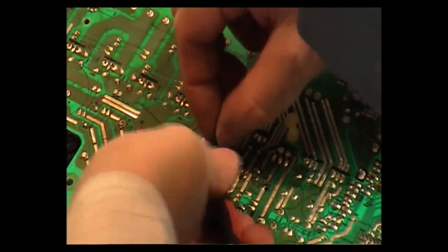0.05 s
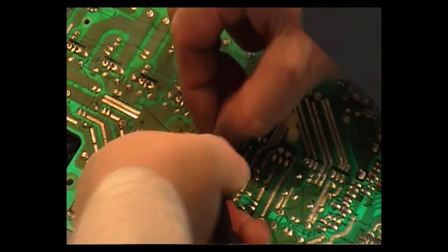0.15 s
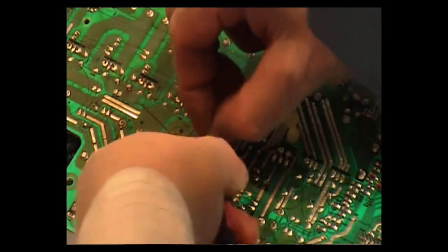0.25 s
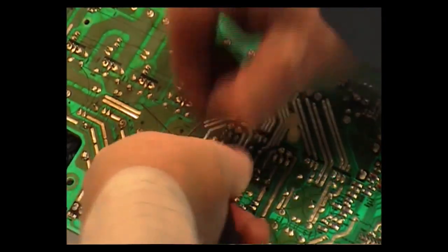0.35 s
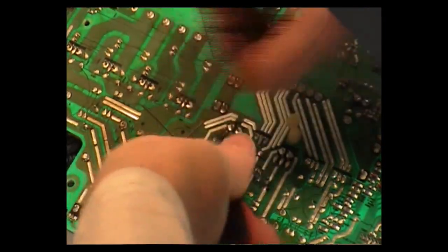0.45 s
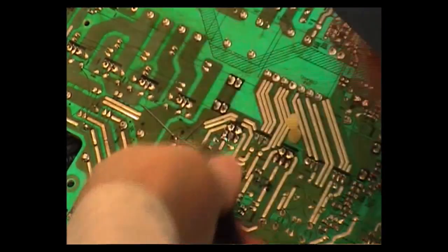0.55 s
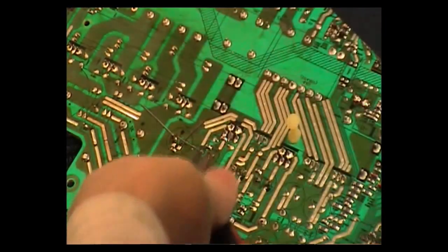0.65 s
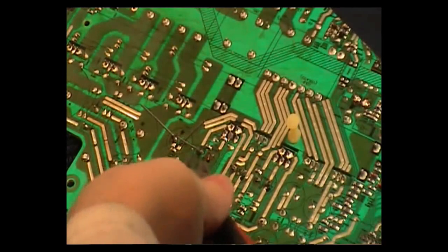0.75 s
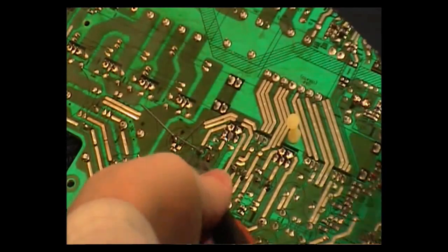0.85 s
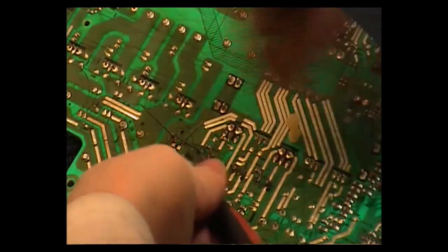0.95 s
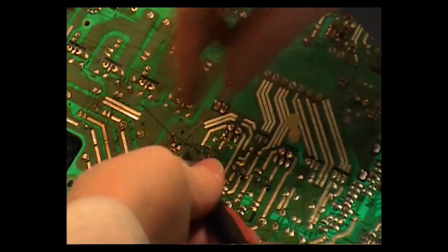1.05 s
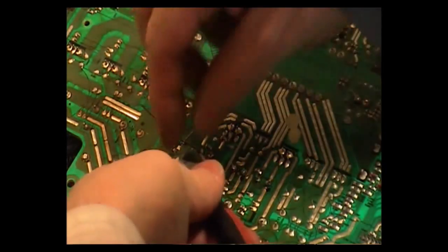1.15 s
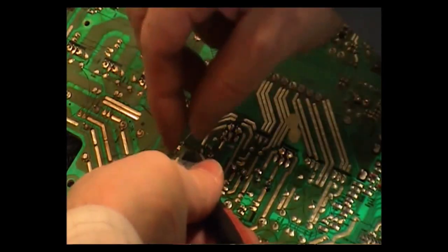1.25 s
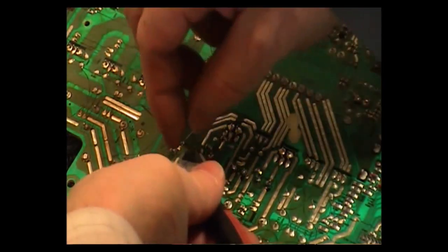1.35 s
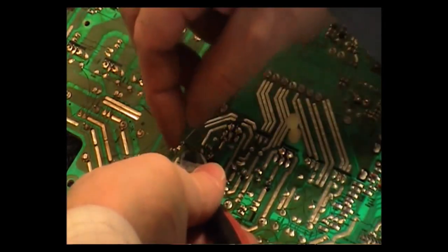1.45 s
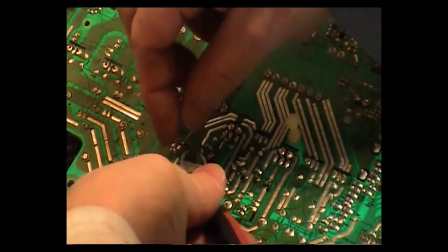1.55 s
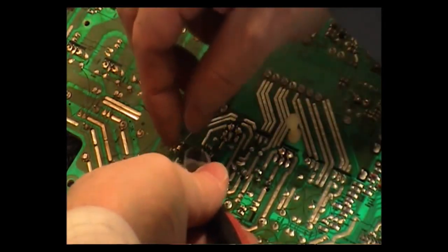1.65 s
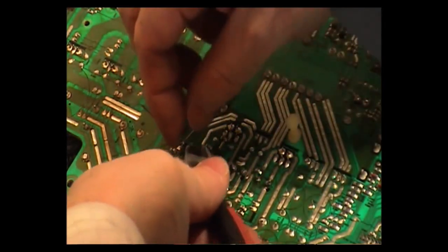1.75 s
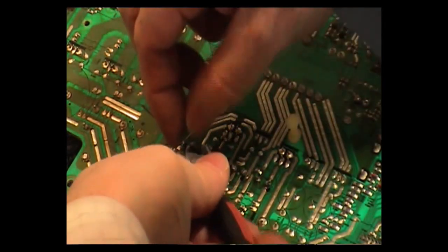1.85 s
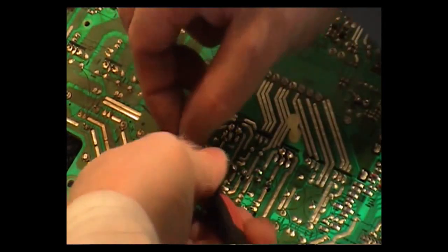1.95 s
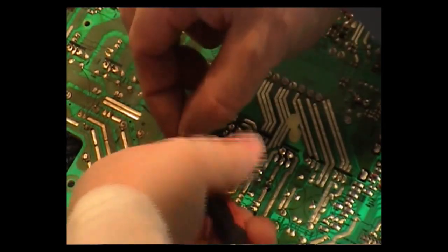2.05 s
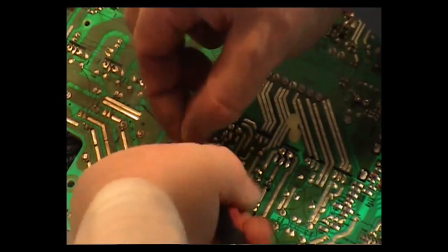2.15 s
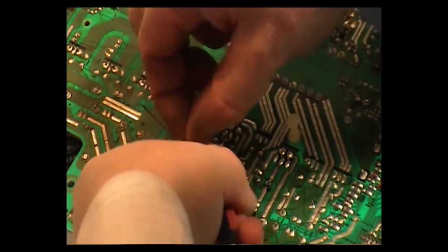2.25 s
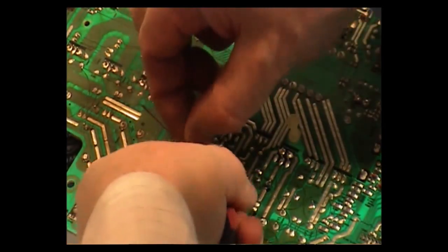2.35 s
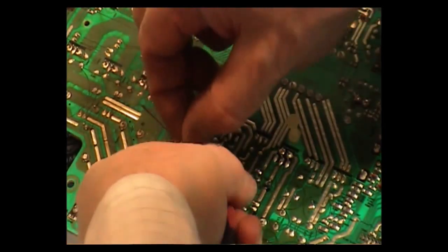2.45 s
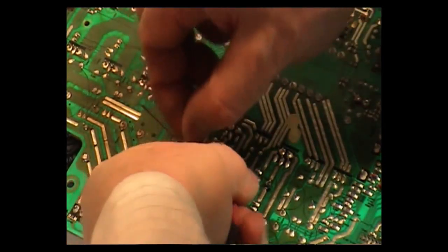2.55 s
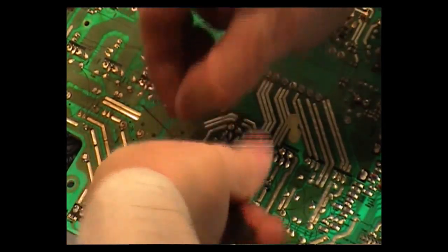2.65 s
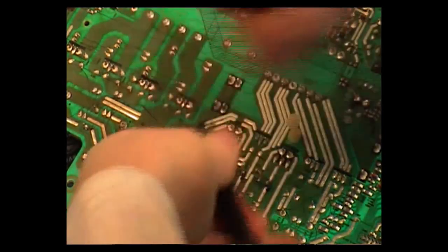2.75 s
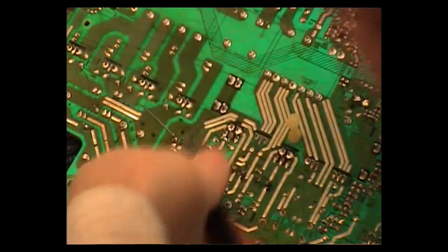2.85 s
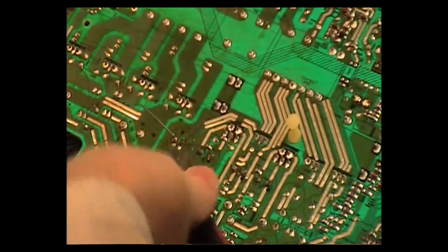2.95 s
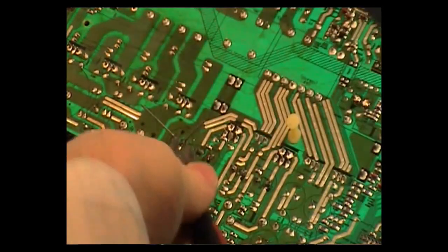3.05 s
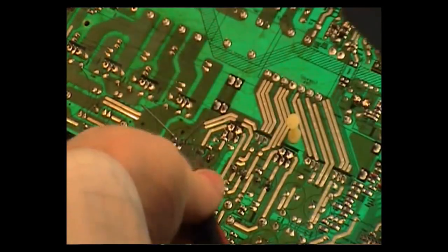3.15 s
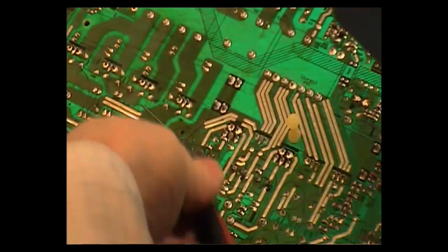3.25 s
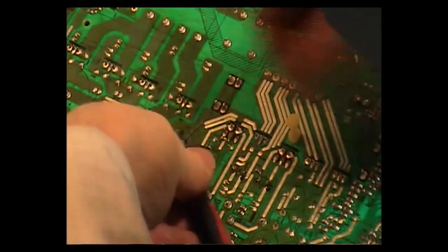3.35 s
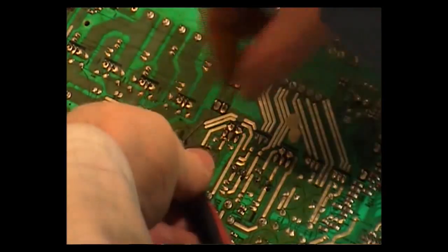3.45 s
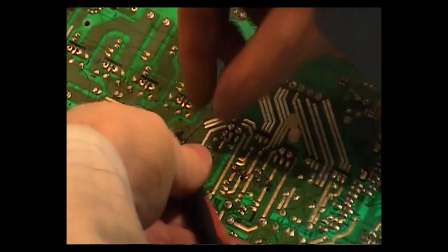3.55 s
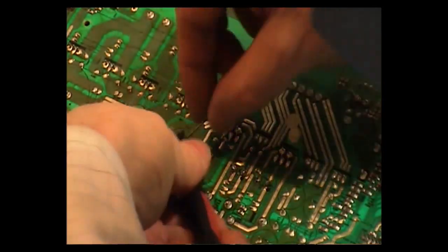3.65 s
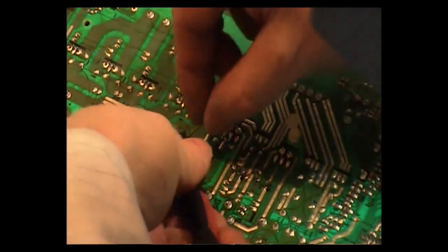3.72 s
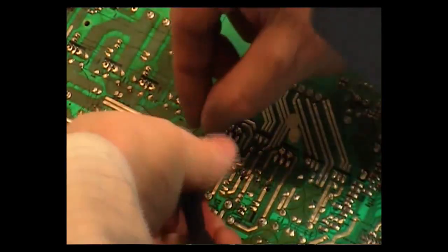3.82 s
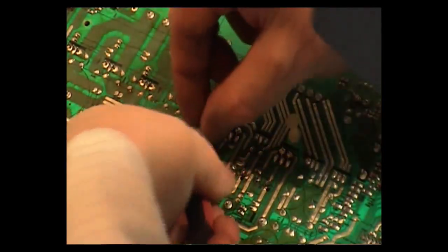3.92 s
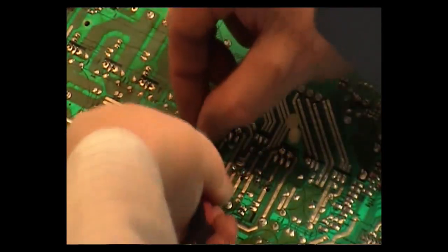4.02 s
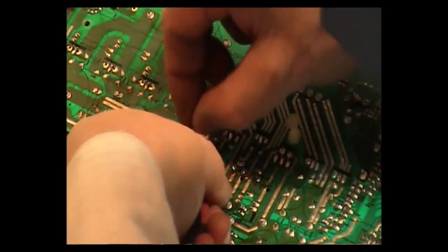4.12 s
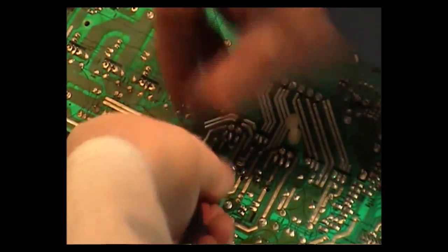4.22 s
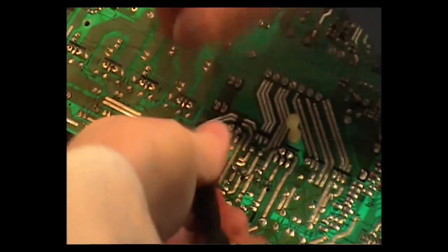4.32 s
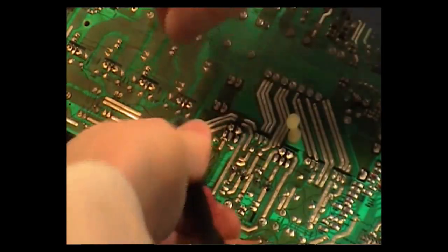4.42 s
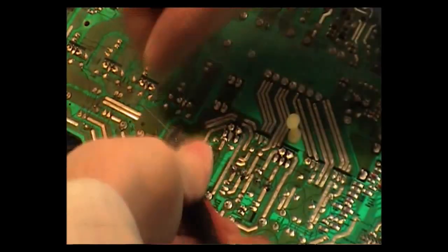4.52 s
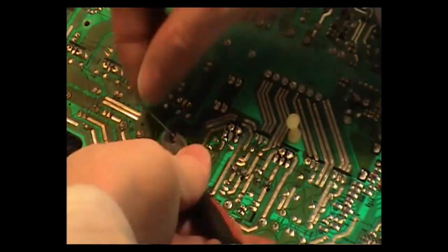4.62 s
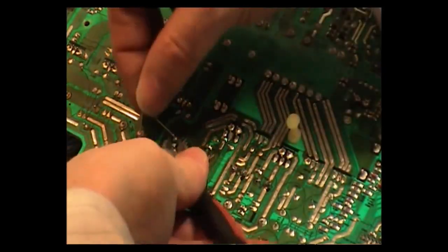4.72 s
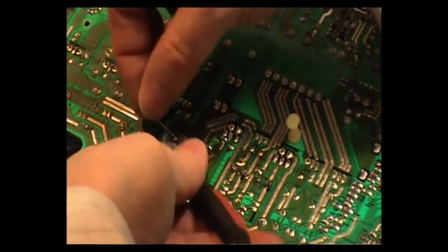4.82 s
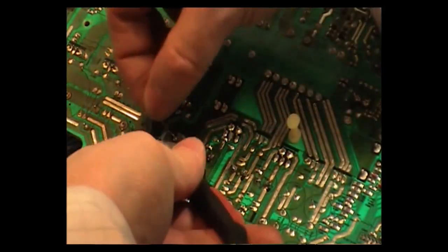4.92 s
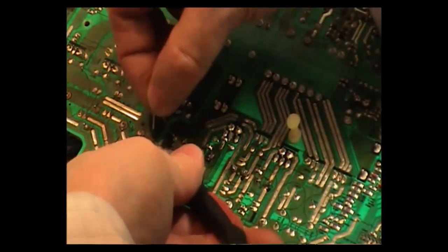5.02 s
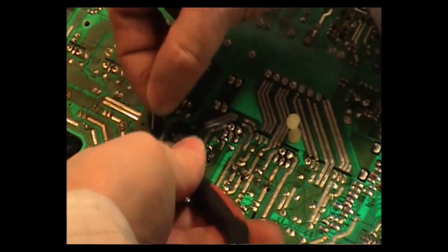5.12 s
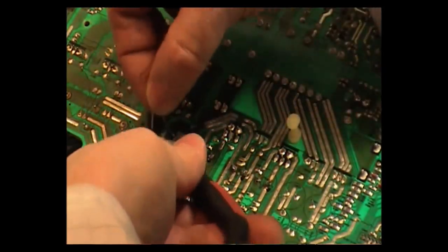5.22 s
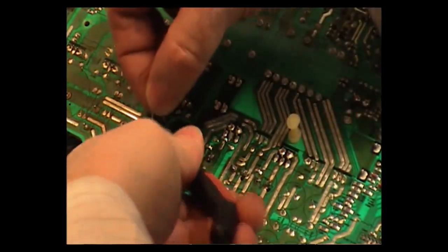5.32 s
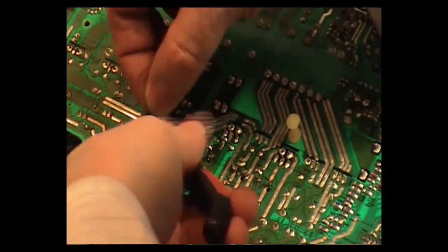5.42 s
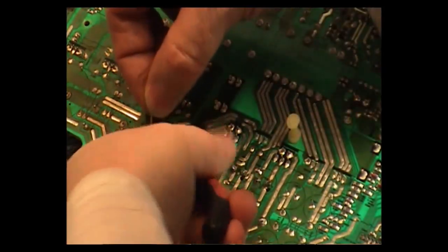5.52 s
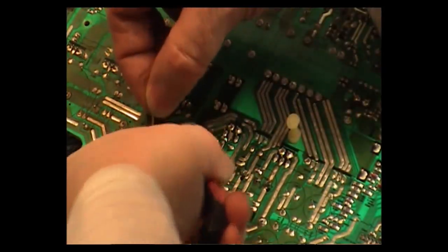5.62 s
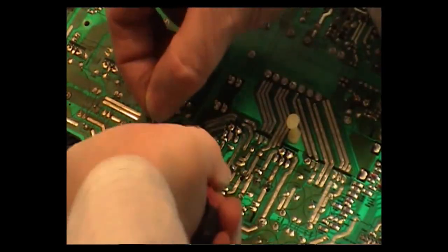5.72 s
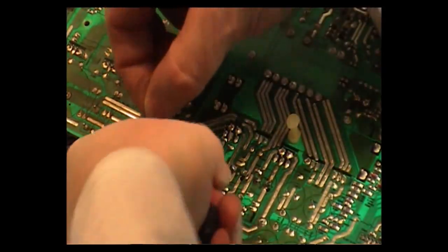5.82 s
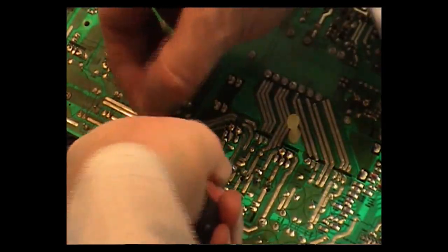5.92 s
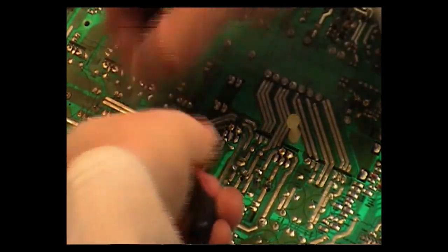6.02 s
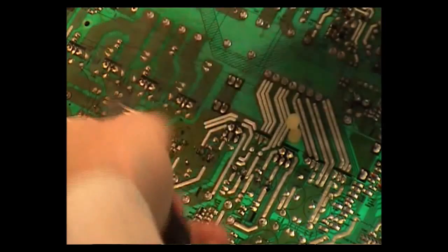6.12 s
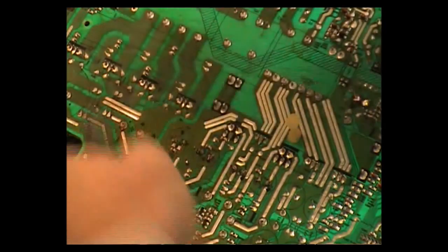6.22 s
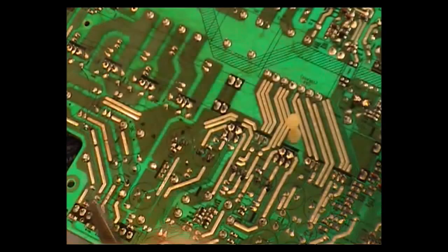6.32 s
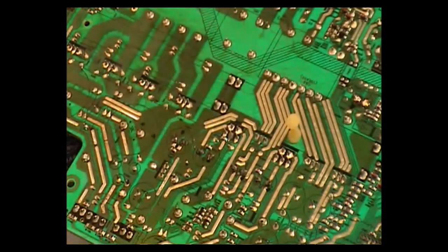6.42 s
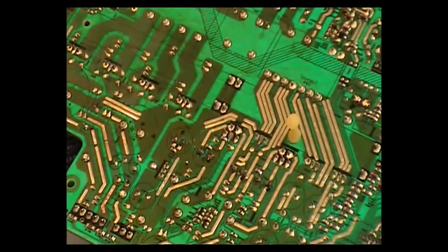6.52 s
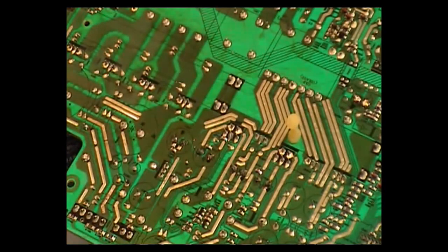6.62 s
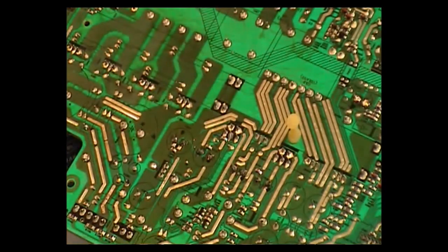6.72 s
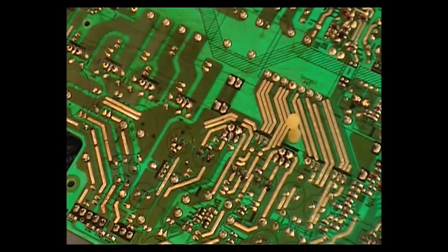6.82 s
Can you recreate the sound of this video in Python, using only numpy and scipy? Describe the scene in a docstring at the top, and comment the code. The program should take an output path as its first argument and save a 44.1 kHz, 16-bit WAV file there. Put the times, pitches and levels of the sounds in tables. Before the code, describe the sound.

About ten crisp snips, roughly half a second to just over a second apart, each with a short bright room tail. Quiet ticks, knocks and gritty rubs of the tool on solder joints fill the gaps. A faint motor whine enters midway and sags in pitch. A short squeak follows the cutting. Close-miked in stereo, over soft room noise and rumble.

```python
"""On a workbench in a small hard room, side cutters snip component leads off a circuit board.
Each cut or sharp click is an impulse of force that rings board, handles, steel jaws and wire, then repeats.
Between cuts the jaws tap, and filtered noise makes the strokes that rub and scrape over the solder joints.
Near the end a stick-slip squeak sounds; room noise, a low rumble and a far motor's sagging whine lie behind.
Two close microphone ports hear it, each with its own cavity resonance in the treble."""
import sys
import numpy as np
from scipy import signal
from scipy.fft import rfft, irfft, next_fast_len
from scipy.io import wavfile
from scipy.ndimage import uniform_filter1d, map_coordinates

SR = 44100
rng = np.random.default_rng(int(sys.argv[2]) if len(sys.argv) > 2 else 0)


def file_out(sig):
    """Save sig as 16-bit WAV at sys.argv[1]."""
    # one column per channel
    cols = np.atleast_2d(sig).T
    # limit, then scale
    lim = np.clip(cols, -1, 1)
    pcm = np.round(lim * 32767).astype(np.int16)
    wavfile.write(sys.argv[1], SR, pcm)


N = 302945  # length of the scene (samples)
SECONDS = np.arange(N) / SR
SIZE = 24576  # length of one contact with its room tail (samples)
T = np.arange(SIZE) / SR
HZ = np.fft.rfftfreq(SIZE, 1 / SR)


def amp(db):
    """Level law: decibels to amplitude gain."""
    return 10 ** (np.asarray(db) / 20)


def unit(x):
    """Normalization: scale to rms 1."""
    return x / np.sqrt(np.mean(np.abs(x) ** 2) + 1e-20)


def along(points, hz):
    """Logarithmic pitch: interpolate (pitch_hz, value) points on a log frequency axis."""
    f, v = np.transpose(points)
    return np.interp(np.log(hz + 1), np.log(f + 1), v)


def curves(rows):
    """Linear interpolation: one value per sample for each column after the time."""
    s, *columns = np.transpose(rows)
    return [np.interp(SECONDS, s, column) for column in columns]


def during(rows):
    """Gating: open over the span of a curve, with softened edges."""
    is_open = (SECONDS > rows[0][0]) & (SECONDS < rows[-1][0])
    return uniform_filter1d(1.0 * is_open, size=400)


def wobble(rate):
    """Random modulation: a smooth curve through rate random knots a second."""
    knots = rng.standard_normal(int(N * rate / SR) + 4)
    return map_coordinates(knots, [np.arange(N) * rate / SR])


def filtered(x, response):
    """Linear filtering: multiply the spectrum of x by a response that is a function of frequency."""
    m = next_fast_len(N + SR // 2)
    return irfft(rfft(x, m) * response(np.fft.rfftfreq(m, 1 / SR)), m)[..., :N]


def resonances(modes, f):
    """Modal superposition: causal second-order resonances with alternating sign."""
    total = 0
    for k, (c, w, db) in enumerate(modes):
        total = total + (-1) ** k * amp(db) * 1j * f * w / (c * c - f * f + 1j * f * w)
    return total


def noise(response, side_db=-22, side_hz=3000, treble_width=.5):
    """Partial coherence: coloured stereo noise, near mono in the bass and wider toward the treble."""
    def mid_and_side(f):
        width = amp(side_db) + treble_width * f / (f + side_hz)
        return response(f) * [np.ones_like(f), width]
    mid, side = filtered(rng.standard_normal((2, N)), mid_and_side)
    return unit(np.array([mid + side, mid - side]))


def add(out, s, x):
    """Superposition: mix x into out from time s, fading its far end to silence."""
    i = max(0, round(s * SR))
    fade = np.clip((T[-1] - .09 - T) / .08, 0, 1)
    out[:, i:i + SIZE] += (x * fade)[:, :max(0, N - i)]


# Cuts of the tool, and sharp clicks such as clippings landing.
# Columns: start_s, board_level_db, hardness (no unit), handle_level_db,
# jaw_level_db, ping_pitch_hz, ping_width_hz, ping_level_db, rebound_delay_s,
# rebound_level_db (relative to the first impact), body_room_db (the board takes 1 dB less), steel_room_db
SNAPS = [(0.4972, -19.5, -0.091, -34.5, -40.5, 2330, 453, -38.5, 0.007, -2, -4, -3.5),
         (1.2729, -38, 0.77, -30, -30.5, 5770, 4000, -40, 0.007, 4, 7.5, -2.5),
         (2.0215, -59, 1.5, -45.5, -54, 6560, 4430, -38.5, 0.0035, -9, 2, 0),
         (2.365, -50, 0.66, -49.5, -37, 9550, 1872, -41.5, 0.0026, -0.5, -1, -8.5),
         (2.7265, -25, 1.26, -26.5, -14.5, 12120, 5000, -28, 0.0026, -6.5, 8.5, -2.5),
         (3.639, -46.5, 1.3, -37.5, -33, 11400, 3500, -32, 0.0031, 1, 1.5, -5),
         (4.0116, -57, 1.17, -42.5, -53.5, 5820, 2777, -30, 0.0022, -1.5, -1.5, 0.5),
         (4.342, -19, -0.32, -29, -26, 10170, 3470, -44.5, 0.0041, -2, -5.5, -7),
         (5.2514, -39.5, 0.86, -54, -53, 3200, 159, -49.5, 0.0033, 1, -2.5, -5),
         (6.0598, -20.5, -0.34, -23.5, -16, 11010, 5000, -30.5, 0.0007, -0.5, 3, -3.5)]


def snaps(parts):
    """Impulsive excitation: a cut or a landing clipping kicks the board, rings steel and wire, strikes again."""
    board, handle, jaws = parts
    out = np.zeros((2, N))
    for (s, board_db, hardness, handle_db, jaw_db, ping_hz, ping_width, ping_db,
         delay, rebound_db, body_wet_db, steel_wet_db) in SNAPS:
        lag = np.exp(-2j * np.pi * HZ * delay)
        rebound = amp(rebound_db) * unit(crack(life=0.0054, grit=3.0)) * lag
        force = unit(crack(life=.0007, grit=1.0)) + rebound
        tail = room()
        wire = resonances([(ping_hz, ping_width, 0)], HZ) ** 2
        kick = crack(life=.004, grit=.35)
        body = struck(kick, board * contact(hardness), board_db, tail, body_wet_db - 1.0)
        body += struck(force, handle, handle_db, tail, body_wet_db)
        steel = struck(force, jaws, jaw_db, tail, steel_wet_db)
        steel += struck(force, wire, ping_db, tail, steel_wet_db)
        add(out, s, irfft(body + steel))
    return out


def crack(life, grit):
    """Impact force: the spectrum of an impulse plus a gritty noise tail that decays over life seconds."""
    return 1 + grit * unit(rfft(rng.standard_normal(SIZE) * np.exp(-T / life)))


def contact(hardness):
    """Contact stiffness: hardness above 0 weakens the low modes against the high; below 0, the reverse."""
    return ((HZ + 300) / (HZ + 2500)) ** hardness


def struck(force, body, db, tail, wet_db, imprint=0.52):
    """Source-filter principle: force times body, direct and by way of the room; db = rms over 10 ms."""
    direct = unit(force * body)
    # the room gathers all directions, which evens out the crack's colour
    evened = (np.abs(force) + 1e-6) ** imprint
    both = direct + amp(wet_db) * unit(tail * body * evened)
    return amp(db) * np.sqrt(SR / 100) * both / np.sqrt(1 + amp(wet_db) ** 2)


# Modes of the board, the handles and the jaws. Columns: pitch_hz, width_hz, level_db (relative)
BOARD = [(251.3, 25.2, -11.5), (313.4, 14, -1.5), (413, 27, -6), (487.8, 17.5, 2.5), (593, 81, 0.5),
         (690, 18, 1.5), (745.7, 11, 3), (818.5, 41, 2), (892, 26, 3), (1007, 59, 3), (1073, 17, 5),
         (1166.3, 26.6, 6), (1326, 25, 0.5), (1435, 29.7, 1.5), (1506, 15, -2.5), (1565, 40, -4.5),
         (1706, 35, -1.5), (1747, 56, -4.5)]
HANDLE = [(1977, 52, 2), (2093, 46.5, 1.5), (2448, 270, 2.5), (2790, 190, 6), (3147, 470, 2.5),
          (3600, 290, 4), (3870, 190, 5.5), (4300, 170, 4), (5340, 270, -11.5)]
JAWS = [(5240, 1120, -15.5), (6460, 730, -7), (7580, 620, -1.5), (8210, 350, -1.5), (8740, 800, -4.5),
        (10080, 720, -5), (10920, 1140, -7.5), (13320, 5500, -15.5)]


def bodies():
    """Modal response: the spectra of board, handles and jaws."""
    return [resonances(modes, HZ) for modes in (BOARD, HANDLE, JAWS)]


HANDLE_FOLLOWS_JAW, HANDLE_DB = 0.61, -1  # handle level: share of the way from board to jaws, offset (dB)
# Light contacts of the jaws with leads and board.
# Columns: start_s, board_level_db, hardness (no unit), jaw_level_db
TAPS = [(0.082, -49.5, 2.5, -63), (0.122, -48, -1, -56.5), (0.648, -39.5, -4, -56.5), (0.656, -36, -4, -72),
        (0.682, -38, -2.3, -53), (0.735, -62, 2, -51), (1.045, -44, -2, -58), (1.144, -48.5, -1, -59),
        (1.215, -40, 0.3, -63), (1.407, -47.5, -1.5, -67), (1.607, -54, 5, -58), (1.734, -46, 5, -53.5),
        (1.806, -49, 6.5, -51.5), (1.895, -50, 5.5, -55), (1.919, -54.5, -2.5, -59), (1.955, -52, 5.5, -56),
        (2.233, -43, -3, -61.5), (2.427, -44.7, -3, -60), (2.461, -47, -2.5, -61.5),
        (2.555, -45.5, -1.9, -63), (2.887, -39.5, -0.2, -61.5), (2.955, -45, -1.5, -67.5),
        (2.968, -46.5, 2.1, -47.5), (3.551, -49, -0.6, -69.5), (3.721, -37.5, 0, -51),
        (3.7253, -39.5, 0, -47), (3.796, -41.5, -0.3, -47), (4.004, -50.5, 4, -46),
        (4.493, -45.5, 0, -51.5), (4.584, -54, 3.5, -40), (4.842, -42.5, -1.5, -58), (4.866, -50, 1.5, -59),
        (5.104, -51.5, -2, -62.5), (5.452, -49.5, -2, -70), (5.52, -47.5, -0.5, -64.5),
        (5.943, -43.5, -1, -59), (5.982, -41.5, -1.4, -64), (6.275, -43, -1.5, -70)]


def taps(parts, body_wet_db=-5, steel_wet_db=-2, soft_hz=12000):
    """Light impact: the jaws feel for the next lead, a knock on the board and a short grating of steel."""
    board, handle, jaws = parts
    softened_jaws = jaws / (1 + 1j * HZ / soft_hz) ** 2
    out = np.zeros((2, N))
    for s, board_db, hardness, jaw_db in TAPS + ticks():
        knock, grate = crack(life=.005, grit=.7), crack(life=.005, grit=1.6)
        tail = room()
        handle_db = board_db + HANDLE_FOLLOWS_JAW * (jaw_db - board_db) + HANDLE_DB
        body = struck(knock, board * contact(hardness), board_db, tail, body_wet_db)
        body += struck(grate, handle, handle_db, tail, steel_wet_db)
        steel = struck(grate, softened_jaws, jaw_db, tail, steel_wet_db)
        add(out, s, irfft(body + steel))
    return out


TICK_COUNT, TICKS_END_S = 12, 6.3
TICK_BOARD_DB, TICK_JAW_DB, TICK_SPREAD_DB = -56.5, -70.5, 3.5  # mean levels and their standard deviation


def ticks():
    """Random process: faint stray touches while the tool hunts, one per equal slot, as rows like the taps."""
    when = (np.arange(TICK_COUNT) + rng.random(TICK_COUNT)) * TICKS_END_S / TICK_COUNT
    rows = []
    for s, (a, hardness, b) in zip(when, rng.standard_normal((TICK_COUNT, 3))):
        rows.append((s, TICK_BOARD_DB + TICK_SPREAD_DB * a, hardness, TICK_JAW_DB + TICK_SPREAD_DB * b))
    return rows


def grains():
    """Asperity contact: a gain that flickers at random as tiny grains catch."""
    return unit(amp(3.5 * wobble(420) + 2.5 * wobble(60)))


def chatter(modes, rolloff_hz=np.inf):
    """Friction-driven resonance: grainy noise rings a body, with the treble rolled off above rolloff_hz."""
    rough = grains() * rng.standard_normal(N)
    return unit(filtered(rough, lambda f: resonances(modes, f) / (1 + (f / rolloff_hz) ** 2)))


# Strokes of hand and tool over the board. Columns: peak_s (firmest pressure), rise_s, fall_s,
# thud_level_db, rub_level_db, scratch_level_db (rub and scratch play 4 dB lower)
DRAGS = [(0.695, 0.054, 0.067, -46, -36.5, -45.5), (0.735, 0.028, 0.19, -53.5, -62, -57),
         (1.77, 0.027, 0.26, -69, -76, -54), (4.125, 0.012, 0.099, -75, -73, -48.5),
         (4.554, 0.1, 0.089, -52, -45, -45), (4.65, 0.043, 0.11, -57, -70, -75),
         (4.781, 0.072, 0.053, -71, -72, -46), (4.86, 0.05, 0.23, -62, -48, -60.5),
         (6.2, 0.36, 0.58, -65, -52.5, -57.5), (6.658, 0.027, 0.073, -76, -50, -50),
         (6.76, 0.086, 0.33, -64, -49.5, -54.5)]
# Colours of the thud and of the scratch noise. Columns: pitch_hz, level_db (relative)
THUD = [(30, -7), (70, -24), (130, 0.5), (250, -5.5), (500, -10.5), (2000, -94)]
SCRATCH = [(800, -20), (2000, -4.5), (3900, -5), (5200, -10), (7800, -13), (10500, -12), (15000, -34)]


def drags(rub_db=-4, scratch_db=-4):
    """Sliding friction: the hand shifts the board while the tool catches on the solder in tiny grains."""
    thud = noise(lambda f: amp(along(THUD, f)))
    rub = chatter(BOARD, rolloff_hz=700)
    steel = chatter(HANDLE) + chatter(JAWS)  # each chatters on its own
    hiss = grains() * noise(lambda f: amp(along(SCRATCH, f)))
    scratch = unit(steel + 2.3 * hiss)
    out = np.zeros((2, N))
    for s, rise, fall, thud_db, row_rub_db, row_scratch_db in DRAGS:
        layers = amp(thud_db) * thud
        layers = layers + amp(row_rub_db + rub_db) * rub
        layers = layers + amp(row_scratch_db + scratch_db) * scratch
        out += stroke(s, rise, fall) * layers
    return out


STROKE_RANGE_DB = 20.5  # change of level over one rise or one fall
STROKE_ROUNDING = 1.2  # above 1, the pressure lingers near its peak


def stroke(peak_s, rise_s, fall_s):
    """Pressure envelope: the gain builds to a peak and eases off."""
    t = SECONDS - peak_s
    distance = np.clip(np.maximum(-t / rise_s, t / fall_s), 0, 10)
    return amp(-STROKE_RANGE_DB * distance ** STROKE_ROUNDING)


SQUEAK_JITTER, SQUEAK_JITTER_PER_S = .012, .5  # relative wander of the slip rate, and its growth
SQUEAK_ATTACK_S, SQUEAK_HOLD_S = .016, .035  # both counted from the start
SQUEAK_DB, SQUEAK_FADE_DB_PER_S = -43.5, 185  # direct level before the fade, and the fade
# Glide of the squeak. Columns: time_s, slip_rate_hz
SQUEAK = [(6.564, 605), (6.588, 628), (6.602, 680), (6.613, 870), (6.63, 820), (6.66, 570), (6.70, 540)]
# Resonances of the squeaking body. Columns: pitch_hz, width_hz, level_db (relative)
SQUEAK_BODY = [(622, 28, -6.5), (2000, 260, -8.5), (2880, 480, -13), (3900, 550, -12.5), (6160, 550, -19),
               (8000, 4700, -24.5)]


def squeak():
    """Stick-slip friction: harmonics of a gliding slip rate swell, hold, and grow less steady as they fade."""
    rate, = curves(SQUEAK)
    age = np.clip(SECONDS - SQUEAK[0][0], 0, 1)
    attack = np.minimum(age / SQUEAK_ATTACK_S, 1) ** 2
    level = attack * amp(SQUEAK_DB - SQUEAK_FADE_DB_PER_S * np.maximum(age - SQUEAK_HOLD_S, 0))
    jitter = (SQUEAK_JITTER + SQUEAK_JITTER_PER_S * age) * wobble(450)
    phase = np.cumsum(rate * (1 + jitter)) / SR
    slips = sum(np.cos(2 * np.pi * k * phase) * amp(5 * wobble(70)) for k in range(1, 14))
    tone = filtered(slips, lambda f: resonances(SQUEAK_BODY, f))
    loudness = np.sqrt(np.abs(uniform_filter1d(tone ** 2, size=400)) + 1e-9)
    direct = tone / loudness * level * during(SQUEAK)
    return signal.fftconvolve(direct[None], irfft(1 + amp(-4) * room()), axes=1)[:, :N]


# Reverberation of the room. Columns: pitch_hz, decay_60db_s
ROOM = [(200, 0.29), (800, 0.31), (2000, 0.34), (4200, 0.41), (8000, 0.36), (15000, 0.22)]


def room(build=0.0029, wall_s=0.035, wall_width=0.0047, wall_db=3):
    """Reverberation: a dense decaying tail builds up and swells briefly as the far walls answer."""
    hz, t, z = signal.stft(rng.standard_normal((2, SIZE)), SR, nperseg=256)
    decay = amp(-60 * t / along(ROOM, hz)[:, None])
    tail = signal.istft(z * decay, SR, nperseg=256)[1][:, :SIZE]
    walls = amp(wall_db * np.exp(-((T - wall_s) / wall_width) ** 2))
    swell = (1 - np.exp(-T / build)) * walls
    return unit(diffuse(rfft(tail * swell), HZ, PORT_GAP))


PORT_GAP = 0.034  # between the microphone ports (m)
ROOM_ALIKE = 0.32  # share of the room's answer that both ports hear alike at any pitch


def diffuse(pair, f, gap):
    """Diffuse-field coherence: two ports hear the bass alike and the treble less so (sound at 343 m/s)."""
    alike = ROOM_ALIKE + (1 - ROOM_ALIKE) * np.sinc(2 * f * gap / 343)
    turn = np.arccos(.99 * np.clip(alike, -1, 1)) / 2
    mid, side = pair[0] * np.cos(turn), pair[1] * np.sin(turn)
    return np.array([mid + side, mid - side])


WHINE_ON_S, WHINE_RISE_S, WHINE_DB = 2.91, .2, -60  # WHINE_DB: middle of the wavering peak level
WHINE_HZ, SAG_FROM_S, SAG_HZ_PER_S = 281, 4.6, 24


def motor():
    """Frequency modulation: a far motor's whine comes in, holds its pitch, then sags as it slows."""
    whine_hz = WHINE_HZ - SAG_HZ_PER_S * np.maximum(SECONDS - SAG_FROM_S, 0)
    phase = np.cumsum(whine_hz * (1 + 0.0119 * wobble(25))) / SR
    onset = np.clip((SECONDS - WHINE_ON_S) / WHINE_RISE_S, 0, 1)
    waver_db = 2.5 * wobble(14)
    return onset * amp(WHINE_DB + waver_db) * np.sin(2 * np.pi * phase)


# Swell of the low rumble. Columns: time_s, level_db (plays 3 dB higher)
RUMBLE = [(0.0, -69), (0.57, -66), (2.05, -68), (2.28, -72.5), (3.54, -61.5), (3.79, -69.5), (4.59, -56.5),
          (6.56, -73.5), (6.87, -57)]


def low_rumble(gain_db=3, pitch_hz=56, width_hz=13):
    """Narrow-band noise: a doubled resonance shapes a low rumble of changing level."""
    level_db = curves(RUMBLE)[0] + gain_db
    return amp(level_db) * noise(lambda f: resonances([(pitch_hz, width_hz, 0)], f) ** 2)


AIR_DB, AIR_RISE_DB_PER_S = -60, 0.4468  # level at the start, and its slow growth
AIR_WIDTH = 1.0  # the share of side to mid approaches this in the treble
# Colour of the room noise. Columns: pitch_hz, level_db (relative)
AIR = [(15, -32), (25, -17), (74, -6.5), (117, -9.5), (175, -11), (285, -6), (416, -9), (775, -11.5),
       (911, -16.5), (1330, -15.5), (2690, -27), (3720, -27.5), (4870, -31), (8140, -30.5), (16000, -40.5)]


def room_noise():
    """Broadband noise: a coloured, wide room noise that grows slowly."""
    air = noise(lambda f: amp(along(AIR, f)), side_hz=1100, treble_width=AIR_WIDTH)
    return amp(AIR_DB + AIR_RISE_DB_PER_S * SECONDS) * air


# The cavities behind the two ports resonate at different pitches.
# Columns: pitch_hz, left_minus_right_db
PORT_BALANCE = [(8800, 0), (9800, 3), (10900, 10), (11700, 3), (13200, -7), (16000, -4)]
# Columns: pitch_hz, left_lead_rad
PORT_PHASE = [(10000, 0), (10900, -.6), (11700, -2.5), (14000, -2.4), (16000, -1.5)]


def ports(f):
    """Cavity resonance: left and right responses that differ in level and phase at constant total power."""
    half = amp(along(PORT_BALANCE, f) / 2) * np.exp(.5j * along(PORT_PHASE, f))
    power = (np.abs(half) ** 2 + np.abs(half) ** -2) / 2
    return np.array([half, 1 / half]) / np.sqrt(power)


def scene():
    """Superposition: cutting, handling, and the background behind them."""
    parts = bodies()
    work = snaps(parts) + taps(parts) + drags() + squeak()
    return work + motor() + low_rumble() + room_noise()


TOP_HZ = 16400  # band limit


def record(dry):
    """Band limiting: the ports colour the treble, peaks clip at full scale, nothing stays above TOP_HZ."""
    clipped = np.clip(filtered(dry, ports), -1, 1)
    return filtered(clipped, lambda f: f < TOP_HZ)


dry = scene()
out = record(dry)
file_out(out)
```